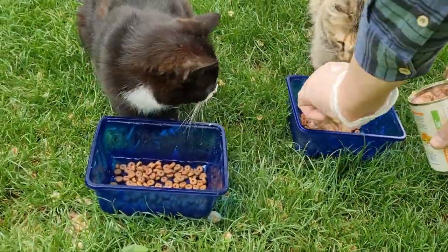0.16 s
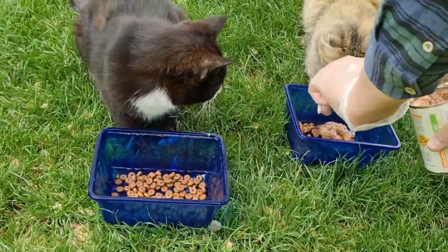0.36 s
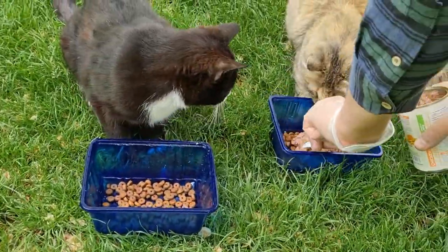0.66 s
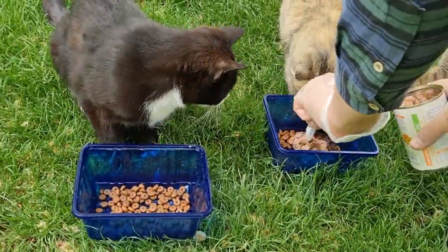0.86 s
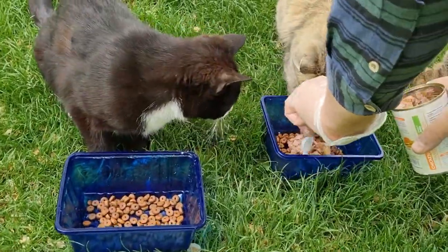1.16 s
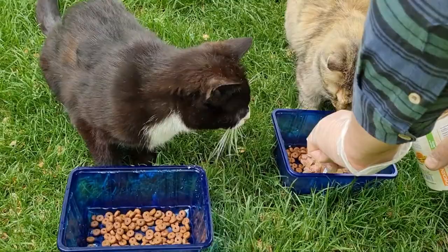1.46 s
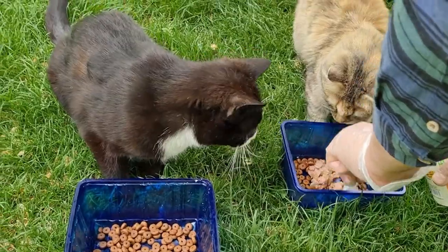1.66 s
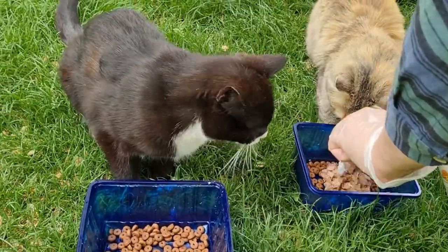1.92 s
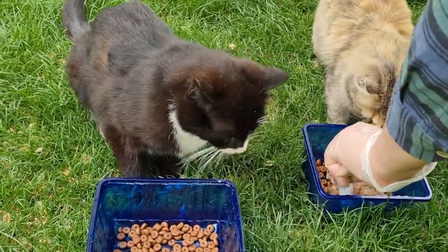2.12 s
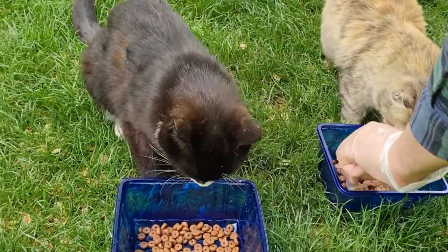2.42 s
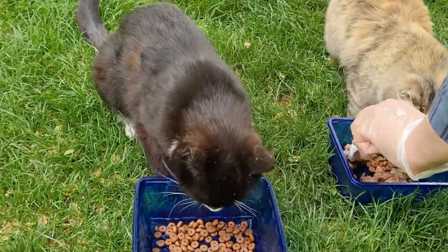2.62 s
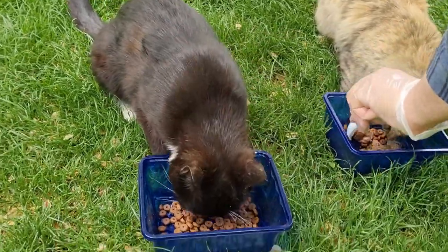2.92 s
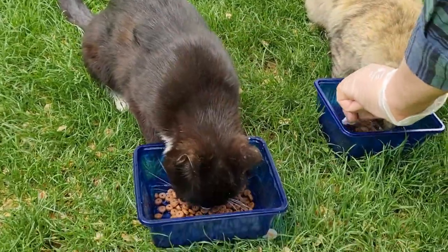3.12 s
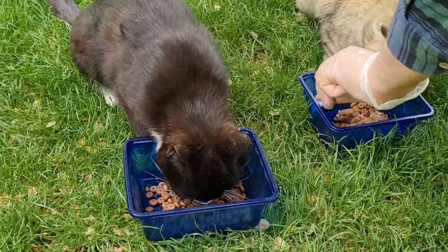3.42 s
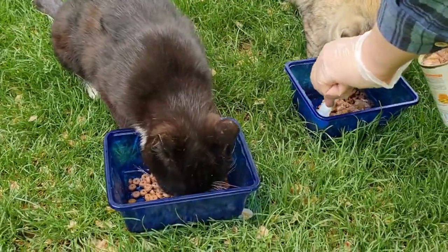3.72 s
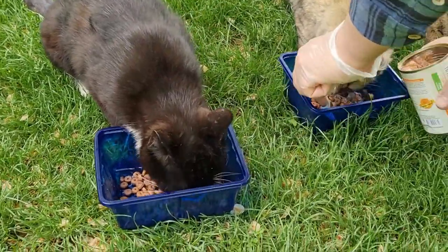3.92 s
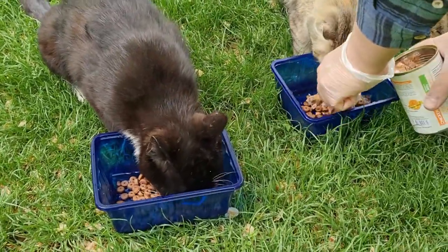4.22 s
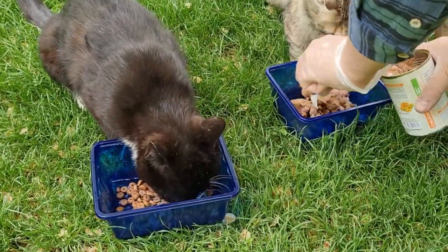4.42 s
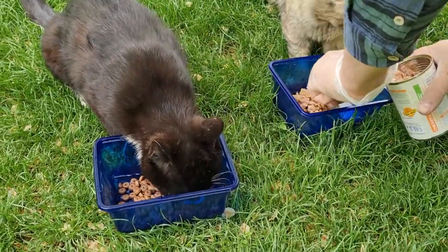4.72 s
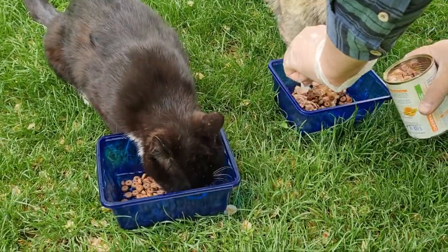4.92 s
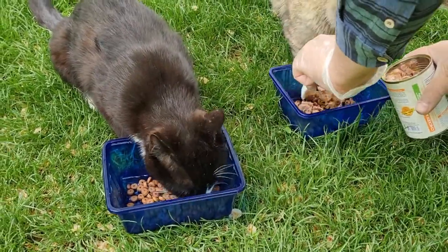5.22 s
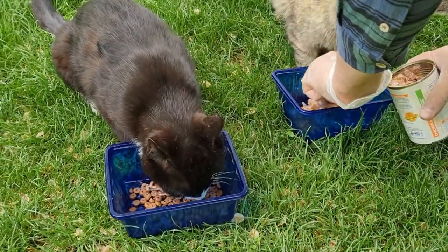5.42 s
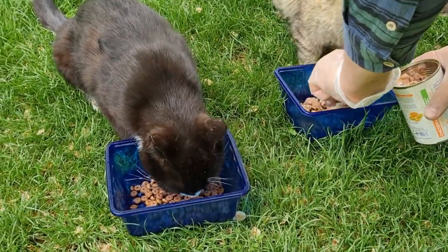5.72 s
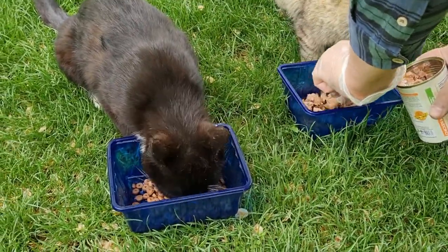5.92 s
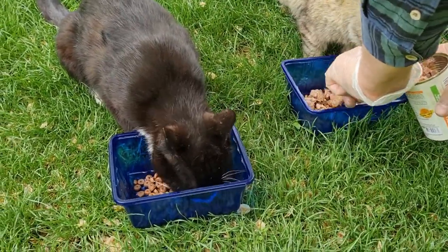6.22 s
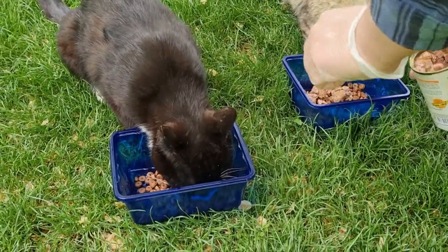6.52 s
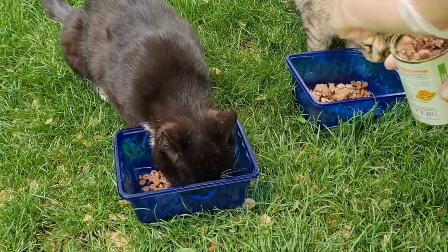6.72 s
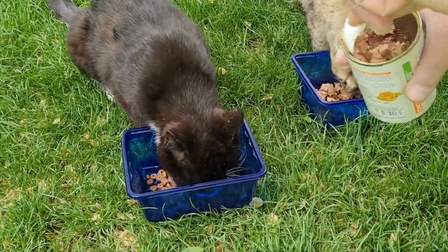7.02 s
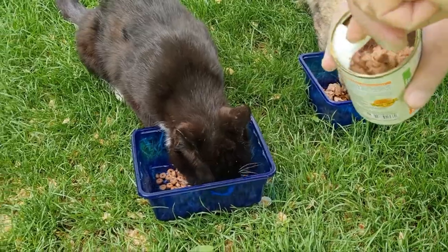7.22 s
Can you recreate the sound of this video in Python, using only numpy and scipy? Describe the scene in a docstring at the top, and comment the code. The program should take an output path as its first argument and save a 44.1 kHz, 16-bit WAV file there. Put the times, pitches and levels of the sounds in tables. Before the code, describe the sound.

Close gritty grinding, wet crackles and dry kibble snaps come in uneven bursts from a plastic tray on grass, far traffic droning behind.

```python
"""On a lawn, close by and a little to the right of a two-port microphone, a gloved hand mashes wet cat food.
From the start, noise clouds and small pings make kibble grind, food crackle and a thin glove rustle.
Pellets snap in the plastic tray from 0.2 s, as short bursts with rings; wet smacks join from 1.6 s as a cat
eats from a second tray. From 1.8 to 4.1 s hard shoves bump the tray on the grass; the last snap is at 7 s.
Far traffic, made of filtered noise and wavering tones, rumbles throughout under a faint wide hiss."""
import sys
import numpy as np
from scipy import signal
from scipy.fft import rfft, irfft
from scipy.io import wavfile
from scipy.ndimage import uniform_filter1d

SR = 44100
rng = np.random.default_rng(int(sys.argv[2]) if len(sys.argv) > 2 else 0)


def transcribe(u):
    """Save the signal u as a 16-bit wav file named by the first command-line argument.

    u: samples, shape (n,) or (channels, n), limited to [-1, 1]; the rate is SR.
    q: integer samples, one column per channel.
    """
    v = np.clip(np.atleast_2d(u).T, -1, 1)
    q = np.round(v * 32767).astype(np.int16)
    wavfile.write(sys.argv[1], SR, q)


N = 324576  # samples

# Fingers pressing into the food, levels before the layers are balanced.
# Each row: moment of greatest force in seconds, build-up in seconds, grinding level in dB,
# wet crackle level in dB, glove crease level in dB.
PRESSES = [(.212, 0.015, -41, -47, -56), (.275, 0.024, -49, -56.5, -68), (.345, 0.013, -50, -63, -73),
           (.622, .012, -51, -59, -72), (.735, .006, -47.5, -51, -62), (1.091, 0.027, -49.5, -57, -62),
           (1.245, .02, -59.5, -74, -80), (1.471, 0.04, -48.5, -52, -63.5), (1.572, .015, -60.5, -58, -66),
           (1.787, 0.031, -43.5, -47.5, -62), (1.93, 0.029, -55, -61.5, -80),
           (2.114, 0.018, -40.5, -45.5, -55), (2.23, 0.013, -56, -60, -63), (2.411, 0.019, -46, -56.5, -74),
           (2.485, 0.056, -51, -56, -68), (2.564, 0.021, -45.5, -52.5, -64),
           (2.82, 0.054, -47.5, -50.5, -65), (2.92, 0.0083, -48, -45.5, -62),
           (3.155, 0.021, -43.5, -51, -66), (3.342, 0.063, -51.5, -53, -64),
           (3.542, 0.0057, -42, -46.5, -57), (3.666, 0.0057, -35.5, -49, -56),
           (3.96, .012, -40.5, -46, -54.5), (4.125, 0.014, -46, -48, -67), (4.33, 0.01, -42.5, -47, -53),
           (4.418, .025, -45, -48.5, -55), (4.565, 0.03, -52, -56.5, -74), (4.735, 0.017, -55, -52.5, -61),
           (4.856, 0.013, -47, -53.5, -61), (4.918, 0.029, -44, -49, -58.5), (5.19, 0.021, -48, -58.5, -65),
           (5.415, 0.0094, -45.5, -59.5, -84), (5.502, .025, -44.5, -47, -63),
           (5.82, 0.015, -47.5, -57.5, -62.5), (5.917, .015, -56.5, -66, -76),
           (6.049, 0.011, -57, -58, -67), (6.109, 0.035, -52.5, -60.5, -74),
           (6.328, 0.022, -49, -53.5, -65), (6.713, .04, -52, -59.5, -73)]
# The hand sliding through the tray, levels before the layers are balanced.
# Each row: start of the steady slide in seconds, its length in seconds, glove rustle level in dB,
# dragged food level in dB.
SLIDES = [(0, .18, -75.5, -72.5), (0.202, 0.095, -68.5, -53), (0.617, 0.29, -62.5, -52.5),
          (1.078, 0.15, -78, -70), (1.746, 0.36, -67.5, -76), (2.07, 0.18, -71, -55),
          (2.757, .3, -72.5, -62), (3.138, 0.27, -62, -57.5), (3.548, 0.31, -67, -52.5),
          (4.078, 0.41, -64.5, -49.5), (4.73, 0.15, -73, -57), (5.23, 0.11, -82, -61),
          (5.806, 0.13, -83, -62.5), (6.037, 0.077, -75, -59.5), (6.33, 0.38, -76.5, -77),
          (6.658, 0.11, -71, -61.5), (6.878, 0.29, -82.5, -66)]
# Pellets snapping against the plastic, levels as rms over 10 ms before colour and balance.
# Each row: moment in seconds, body level in dB, crack level in dB,
# share of the energy in one clean break (0-1, limited when used), pitch of the struck spot in Hz.
PELLET_SNAPS = [(0.1872, -40.5, -49, .7, 1460), (0.2105, -37, -49, .9, 1500), (.2938, -46, -62, .9, 1810),
                (.3779, -45, -61, .6, 1640), (0.61, -40, -59, 0, 1340), (0.6266, -44, -59, .7, 1440),
                (.7335, -34, -48, .1, 1470), (1.0536, -39, -47.5, 0.3, 1630), (1.057, -37.5, -58, 1, 1690),
                (1.7832, -41, -37.5, .2, 2100), (1.795, -41.5, -57, 1, 1500),
                (2.1058, -43.5, -49.5, .4, 1610), (2.1218, -35.5, -53, .6, 1130),
                (2.5028, -44.5, -54.5, .9, 1900), (2.7773, -45, -58, .6, 1690),
                (2.8111, -41.5, -51, .4, 1740), (2.8263, -37, -39.5, 0.75, 2000),
                (2.917, -33.5, -46, .3, 1840), (2.9225, -30.5, -41, 0.74, 2380), (2.981, -44, -59, 1, 1410),
                (3.1498, -44, -62, .8, 2120), (3.2045, -42.5, -52, 0.4, 1510), (3.218, -45, -54, .5, 1480),
                (3.3427, -38, -50.5, 0.5, 1520), (3.54, -37.5, -40, .2, 1210), (3.5537, -37, -40, .9, 1310),
                (3.5894, -42, -55, .4, 1620), (3.6642, -31, -34.5, 0.56, 1860),
                (3.6799, -38.5, -48, .6, 1660), (3.8722, -44, -68, .7, 2230), (4.047, -44, -53, 0.7, 1000),
                (4.0636, -42.5, -43, 0.95, 1750), (4.376, -40, -46.5, .5, 2430),
                (4.8008, -42.5, -52.5, .5, 1600), (5.1862, -32.5, -46, 0.83, 1540),
                (5.408, -41, -70, .7, 1530), (5.497, -40.5, -57, .2, 1520),
                (5.5044, -36.5, -43.5, .5, 2940), (5.521, -41, -49, .4, 1580),
                (6.3981, -47.5, -61.5, .8, 1150), (7.03, -52, -74, .5, 1500)]
# Hard shoves that bump the tray on the grass, levels as rms over 10 ms before colour and balance.
# Each row: moment in seconds, level in dB, pitch of the flexing floor in Hz.
TRAY_BUMPS = [(1.7836, -43, 480), (2.1207, -46, 716), (3.5533, -37, 330), (3.6644, -43, 700),
              (3.6799, -41, 370), (4.047, -38.5, 900), (4.0636, -43, 400)]
# Ring of the thin plastic tray. Each row: mode frequency in Hz, relative level in dB, 60 dB decay in seconds.
TRAY_MODES = [(1045, -11, 0.04), (1484, -5.5, 0.068), (1750, -6, 0.023), (1868, -9, 0.036),
              (2580, -5, 0.039), (3320, -12, .03)]
# Small wet smacks of mouths and moist food.
# Each row: moment in seconds, relative level of the first pop in dB, its pitch in Hz.
WET_SMACKS = [(1.568, -46, 4640), (2.599, -44, 6150), (3.6082, -32, 4530), (4.6279, -52, 7350),
              (4.6548, -41, 5100), (4.7007, -43, 3810), (5.8016, -43.5, 6640), (6.1195, -44, 5350),
              (6.244, -44, 3770), (6.2821, -49, 4080), (7.1656, -53, 4790)]

# Colours of the close sounds. Each row: frequency in Hz, relative spectral level in dB.
GRIND_COLOUR = [(150, -9.5), (350, 1), (750, -3.5), (1050, -5), (1550, -1), (2200, -2), (3100, -13.5),
                (4500, -21.5), (9000, -46)]
CRACKLE_COLOUR = [(1500, -10.5), (3000, 3), (4100, 4), (5300, -1.5), (6300, -10.5), (7700, -6.5),
                  (9200, -16), (14000, -33)]
GLOVE_COLOUR = [(3000, -25), (6500, -1.5), (7800, -4.5), (9000, -4), (11500, 1), (14000, -4.5),
                (16000, -1.5)]
THUD_COLOUR = [(120, -37), (250, 3.5), (350, 4.5), (480, -11), (750, -10), (1150, -17.5), (2500, -48.5)]
BODY_COLOUR = [(300, -21.5), (800, -20), (1100, -8.5), (1650, 3.5), (2200, -1.5), (2900, -5), (4000, -24),
               (8000, -48)]
CRACK_COLOUR = [(1200, -53), (2800, 2.5), (4000, 10), (5500, 2), (7600, 0), (9200, -2.5), (12000, -0.5),
                (16000, -17)]

# Colours of the distance: traffic, the wide low noise and the hiss of the open air.
# Each row: frequency in Hz, relative spectral level in dB.
TRAFFIC_COLOUR = [(13, -38.5), (22, -21.5), (48, -3), (69, 3), (97, -5), (141, -2), (182, -12), (242, -11),
                  (343, -15), (417, -29.5), (480, -28), (620, -45), (1060, -120)]
WIDE_COLOUR = [(30, 10.5), (65, 16.0), (140, 8.0), (300, 9.0), (500, -23.5), (900, -37)]
AIR_COLOUR = [(200, -5.5), (400, 0), (700, -2), (1000, -4), (1700, -7), (2400, -18), (3200, -27),
              (4200, -23), (5500, -33), (7300, -32), (8500, -36.5), (15500, -35)]
# Far engines droning, before the traffic swell.
# Each row: pitch in Hz, rate of wavering in Hz, level in dB.
ENGINE_DRONES = [(66.55, 12, -53), (136.7, 12, -53), (234.3, 14, -59.5)]
# The traffic swells and recedes. Each row: time in seconds, gain in dB.
TRAFFIC_SWELL = [(0, 2), (1, 0.5), (2, .5), (3.3, -1.5), (4.5, 0.3), (5.5, -0.7), (6.4, -0.4), (7.3, -1.5)]

# a press lets go quickly, then the food settles
RELEASE_S, SETTLE_S, SETTLE_DB = 0.026, 0.093, -16
SLIDE_ATTACK_S, SLIDE_RELEASE_S = 0.019, 0.075
SLIDE_WET_DB = -7.5  # wet crackle of a slide against its dragged food
SNAP_THUD_DB = -22.5  # thud of a snap against its body, before colour and balance
FLOOR_DB = -5  # ring of the tray floor against the bump, before colour and balance
# crumbs fly just before a break and thin out after it: times to fall by 1/e
CRUMB_LEAD_S, CRUMB_DECAY_S = 0.00076, 0.004
PORT_LAG_S = 0.00013
TOP_HZ = 15700


def stirring():
    """The hand works the food: clouds of tiny contacts in pellets, moist food and glove share one motion."""
    grind_db, wet_db, glove_db = handwork() + sticking(hold_db=-1.5, hold_s=0.014)
    slip = walk(110)  # the fingers catch and slip
    ticks = grains(130, 2.5)  # single pellets shifting are heard in every band
    food = grinding(grind_db, slip, ticks) + squelches(wet_db) + wet_crackle(wet_db, slip, ticks)
    return food + glove_rustle(glove_db, slip, ticks)


def grinding(level_db, slip, ticks):
    """Pellets rub as dense clicks, and each knocks at its own pitch; the tray rings with both."""
    rubbing = (grains(2500, 1.5) + 0.32 * ticks) * undb(level_db + 3.26 * slip - 5.0)
    rubbing = at_ports(rubbing, right_db=1.5, scatter_db=-1.5, scatter_t60=0.016, yard_db=-6, yard_t60=0.19)
    knocks = pings(hz=1613, octaves=0.76, cycles=2.15, spread_db=4.0, count=1300)
    knocks = knocks * undb(level_db + slip - 6.5)
    return in_tray(colour(rubbing, GRIND_COLOUR) + from_right(knocks, right_db=3.5), ring_db=-5)


def squelches(level_db):
    """Now and then a larger lump parts with a short ring of its own pitch."""
    lumps = pings(hz=2510, octaves=1.0, cycles=8, spread_db=3.0, count=350)
    return from_right(lumps * undb(level_db - 7.0), right_db=2.5)


def wet_crackle(level_db, slip, ticks):
    """Moist food crackles as fine clicks, and each bursting film of gravy pops at its own pitch."""
    crackle = (grains(4000, 2.6) + 0.46 * ticks) * undb(level_db + 3.3 * slip - 4.5)
    crackle = at_ports(crackle, right_db=2.5, scatter_db=0, scatter_t60=0.0039, yard_db=-10, yard_t60=0.28)
    pops = pings(hz=5000, octaves=0.674, cycles=7, spread_db=3.0, count=1700)
    pops = pops * undb(level_db + slip - 9.0)
    return colour(crackle, CRACKLE_COLOUR) + from_right(pops, right_db=0.5)


def glove_rustle(level_db, slip, ticks):
    """The thin glove crinkles in a very dense cloud of uneven clicks, high in pitch."""
    rustle = (grains(9000, 4.0) + 0.3 * ticks) * undb(level_db + 1.7 * slip - 4.0)
    rustle = at_ports(rustle, right_db=3.5, scatter_db=5, scatter_t60=0.0079, yard_db=-22, yard_t60=0.12)
    return colour(rustle, GLOVE_COLOUR)


def handwork():
    """Levels in dB of grinding, wet crackle and glove rustle: the energies of all presses and slides add up."""
    energy = np.zeros((3, N))
    for s, build_s, grind_db, wet_db, glove_db in PRESSES:
        squeeze = swell(s, 0, build_s, RELEASE_S)
        settling = undb(SETTLE_DB) * swell(s, 0, build_s, SETTLE_S)
        energy += undb([[grind_db], [wet_db], [glove_db]]) ** 2 * (squeeze ** 2 + settling ** 2)
    for s, length_s, glove_db, food_db in SLIDES:
        speed = swell(s, length_s, SLIDE_ATTACK_S, SLIDE_RELEASE_S)
        energy += undb([[food_db], [food_db + SLIDE_WET_DB], [glove_db]]) ** 2 * speed ** 2
    return 10 * np.log10(energy)


def sticking(hold_db, hold_s):
    """Level dip in dB: the food holds still under the fingers just before each pellet gives way."""
    t = np.arange(N) / SR
    times = np.append(np.sort(np.array(PELLET_SNAPS)[:, 0]), np.inf)
    wait = times[np.searchsorted(times, t)] - t
    return hold_db * np.exp(-wait / hold_s)


def snaps_and_bumps(size=2048):
    """Pellets break and scatter crumbs as the struck spot rings; snaps and shoves thud the tray on the grass."""
    t = (np.arange(size) - size // 2) / SR
    thud, body, crack, spot = np.zeros((4, N))
    for s, body_db, crack_db, share, hz in PELLET_SNAPS:
        burst = fracture(t, share)
        add(thud, s, burst, body_db + SNAP_THUD_DB)
        add(body, s, burst, body_db)
        add(crack, s, burst * np.exp(-np.abs(t) / 0.021), crack_db)  # late crumbs are duller than the break
        add(spot, s, ping(np.maximum(t, 0), hz, cycles=3.1), body_db)
    for s, db, hz in TRAY_BUMPS:
        add(thud, s, fracture(t, share=0.69), db)
        add(spot, s, ping(np.maximum(t, 0), hz, cycles=1.7), db + FLOOR_DB)
    thud = at_ports(thud, right_db=-2.0, scatter_db=-9.0, scatter_t60=0.025, yard_db=-26, yard_t60=0.2)
    body = at_ports(body, right_db=2.0, scatter_db=-2.5, scatter_t60=0.015, yard_db=-8.5, yard_t60=0.28)
    crack = at_ports(crack, right_db=3.5, scatter_db=-1.5, scatter_t60=0.015, yard_db=-28, yard_t60=0.1)
    sound = undb(3.0) * colour(thud, THUD_COLOUR)
    sound = sound + undb(-7.5) * colour(body, BODY_COLOUR)
    sound = sound + undb(-3.0) * colour(crack, CRACK_COLOUR)
    return in_tray(sound + undb(-5) * from_right(spot, right_db=2.0), ring_db=-11.5)


def fracture(t, share):
    """One clean break at t = 0 among crumbs that start just before it and thin out after it."""
    share = np.clip(share, 0.1, 0.95)
    crumbling = np.exp(np.where(t < 0, t / CRUMB_LEAD_S, -t / CRUMB_DECAY_S))
    crumbs = (rng.random(len(t)) < 4000 / SR) * rng.standard_normal(len(t)) * crumbling
    burst = np.sqrt(1 - share) * crumbs / np.linalg.norm(crumbs)
    burst[len(t) // 2] = rng.choice([-1, 1]) * np.sqrt(share)
    return burst


def smacks(size=400):
    """A wet film parts with three quick pops of nearly the same pitch."""
    out, t = np.zeros(N), np.arange(size) / SR
    for s, db, hz in WET_SMACKS:
        for k, (gap, detune) in enumerate(rng.random((3, 2))):
            i = int((s + 0.00091 + k * gap * 0.00074) * SR)
            own_hz = hz * 2 ** (k * 0.68 * (detune - 0.5))
            out[i:i + size] += undb(db - 2.2 * k) * ping(t, own_hz, cycles=3.8)
    return from_right(out, right_db=2) * undb(-1.5)


def outdoors():
    """The distance behind the tray: traffic, wide low noise and hiss, all continuous."""
    return traffic() + wide_air()


def traffic():
    """Far traffic rumbles almost alike at both ports; engine drones waver as two slowly changing quadratures."""
    t = np.arange(N) / SR
    rumble = colour(rng.standard_normal(N), TRAFFIC_COLOUR, size=16384) * undb(-41.6 + walk(9))
    for hz, rate, db in ENGINE_DRONES:
        drone = walk(rate) * np.sin(2 * np.pi * hz * t) + walk(rate) * np.cos(2 * np.pi * hz * t)
        rumble = rumble + undb(db) * drone
    swell_db = np.interp(t, *np.transpose(TRAFFIC_SWELL))
    return rumble * undb(0.21 * np.array([[1], [-1]]) + swell_db)


def wide_air():
    """Low noise opposed at the two ports, and a faint hiss of common and opposed noise that wavers slowly."""
    sides = np.array([[1], [-1]])
    low = sides * colour(rng.standard_normal(N), WIDE_COLOUR, size=8192)
    common = colour(rng.standard_normal(N), AIR_COLOUR)
    opposed = 1.09 * sides * colour(rng.standard_normal(N), AIR_COLOUR)
    return undb(-55.5) * low + (common + opposed) * undb(-61.5 + 1.04 * walk(2.82))


def in_tray(x, ring_db, size=4096):
    """The thin plastic rings briefly after every contact, as a sum of decaying modes."""
    t = np.arange(size) / SR
    ring = sum(undb(db) * fading(t60, size) * np.cos(2 * np.pi * hz * t) for hz, db, t60 in TRAY_MODES)
    return x + undb(ring_db) * convolve(x, ring / np.abs(rfft(ring)).max())


def at_ports(x, right_db, scatter_db, scatter_t60, yard_db, yard_t60):
    """The direct sound, and a diffuse wash from the tray walls and the yard that follows its energy."""
    energy = 0
    for db, t60 in ((scatter_db, scatter_t60), (yard_db, yard_t60)):
        keep = np.exp(-2 * np.log(1000) / (t60 * SR))
        energy = energy + undb(db) ** 2 * signal.lfilter([1 - keep], [1, -keep], x ** 2 + 1e-18)
    wash = from_right(np.sqrt(energy), right_db) * rng.standard_normal((2, N))
    return from_right(x, right_db) + wash


def from_right(x, right_db):
    """The left port hears the sound later; right_db is the level at the right port over the left."""
    left = np.interp(np.arange(N) - round(PORT_LAG_S * SR), np.arange(N), x)
    return np.array([left, x]) * undb(np.array([[-right_db], [right_db]]) / 2)


def grains(rate, spread_db):
    """Tiny clicks of either sign at a mean rate per second, a few far larger than the rest."""
    sizes = undb(spread_db * np.minimum(rng.exponential(size=N), 5))
    return unit((rng.random(N) < rate / SR) * rng.choice([-1, 1], N) * sizes)


def ping(t, hz, cycles):
    """A damped ring that falls by 1/e in the given number of cycles."""
    return np.sin(2 * np.pi * hz * t) * np.exp(-hz * t / cycles)


def pings(hz, octaves, cycles, spread_db, count, size=512):
    """A cloud of short rings, each with its own moment, pitch (within octaves either way) and size."""
    when, pitch, big = rng.random((count, 3)).T[:, :, None]
    own_hz = hz * 2 ** (octaves * (2 * pitch - 1))
    sizes = undb(-spread_db * np.log(big + np.exp(-4)))
    rings = ping(np.arange(size) / SR, own_hz, cycles) * sizes
    places = (when * (N - size)).astype(int) + np.arange(size)
    return unit(np.bincount(places.ravel(), rings.ravel(), N))


def add(track, s, sound, db):
    """Centre a short sound on a moment, at a level that is its rms over 10 ms."""
    i = int(s * SR) - len(sound) // 2
    track[i:i + len(sound)] += undb(db) * sound / np.linalg.norm(sound) * np.sqrt(0.01 * SR)


def swell(start, hold_s, attack_s, release_s):
    """An envelope that grows up to its start, holds at 1 and dies away."""
    t = np.arange(N) / SR - start
    growing = np.minimum(t, 0) / attack_s
    dying = np.maximum(t - hold_s, 0) / release_s
    return np.exp(np.maximum(growing - dying, -40))


def walk(rate):
    """Random levels of rms 1, held 1 / rate s and smoothed twice."""
    k = int(SR / rate)
    held = np.repeat(rng.standard_normal(N // k + 1), k)
    return unit(uniform_filter1d(uniform_filter1d(held, k), k)[:N])


def fading(t60, size):
    """An envelope that falls 60 dB in t60 seconds."""
    return np.exp(-np.log(1000) * np.arange(size) / SR / t60)


def colour(x, points, size=1024):
    """Causal minimum-phase filter of unit energy through (Hz, dB) points, along the last axis."""
    hz, db = np.transpose(points)
    f = np.maximum(np.arange(size // 2 + 1) * SR / size, 1)
    below = np.minimum(f / hz[0], 1) ** 2  # roll-off under the first point
    cepstrum = irfft(np.log(below * undb(np.interp(np.log(f), np.log(hz), db))))
    # fold the cepstrum onto positive time
    cepstrum[1:size // 2] *= 2
    cepstrum[size // 2 + 1:] = 0
    response = irfft(np.exp(rfft(cepstrum)))
    return convolve(x, response / np.linalg.norm(response))


def convolve(x, response):
    """Pass each channel through an impulse response."""
    return signal.oaconvolve(np.atleast_2d(x), response[None], axes=1)[:, :N]


def unit(x):
    """Scale to rms 1."""
    return x / np.sqrt(np.mean(x ** 2))


def undb(db):
    """Decibels to gain."""
    return 10 ** (np.asarray(db) / 20)


def scene():
    """Hand, pellets, mouths and the open air."""
    return stirring() + snaps_and_bumps() + smacks() + outdoors()


def record(dry):
    """The recorder cuts the top with a steep low-pass filter."""
    return signal.sosfilt(signal.ellip(10, 0.2, 70, TOP_HZ, fs=SR, output="sos"), dry)


dry = scene()
out = record(dry)
transcribe(out)
```